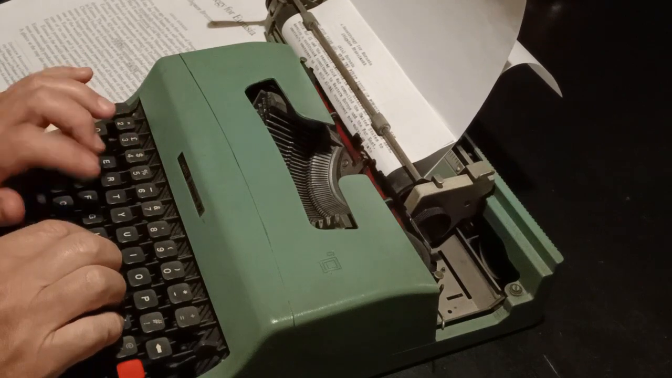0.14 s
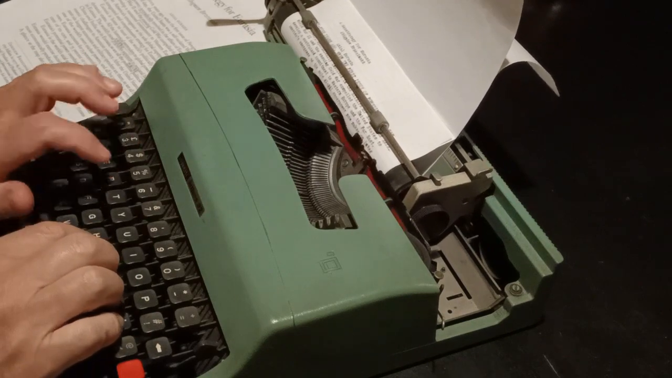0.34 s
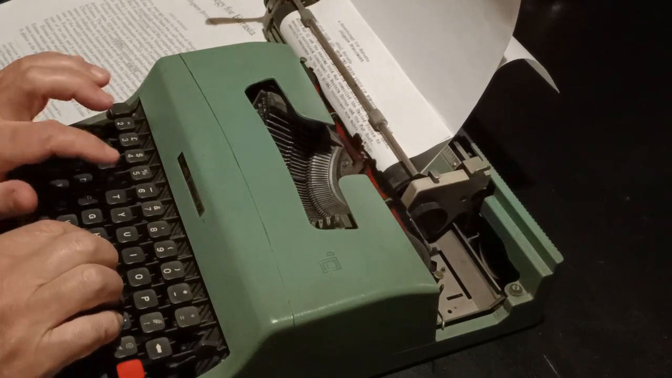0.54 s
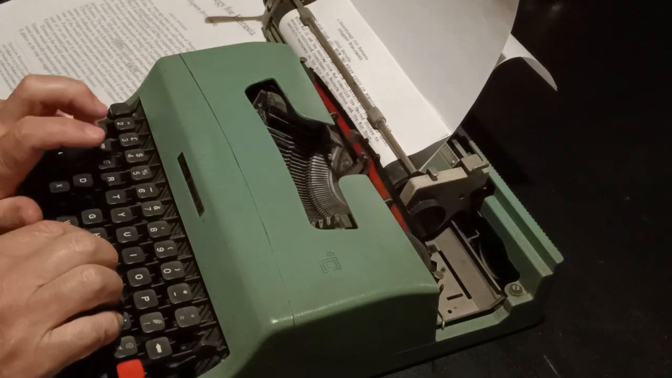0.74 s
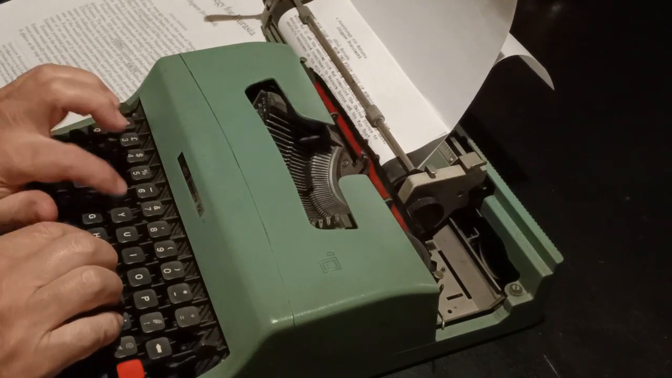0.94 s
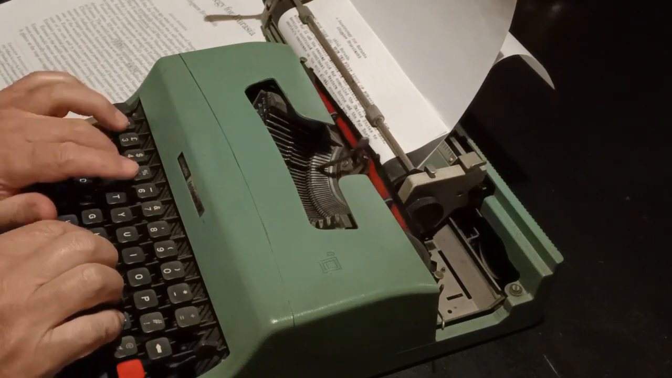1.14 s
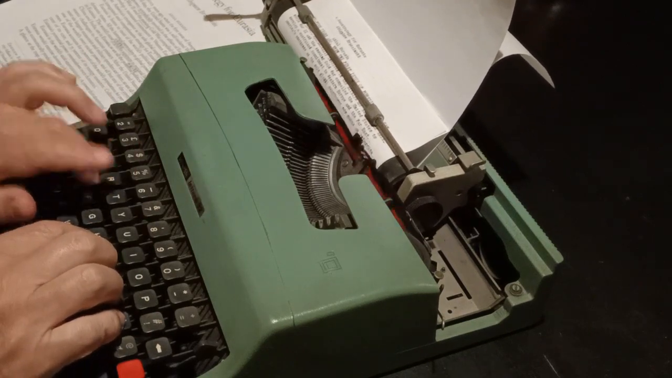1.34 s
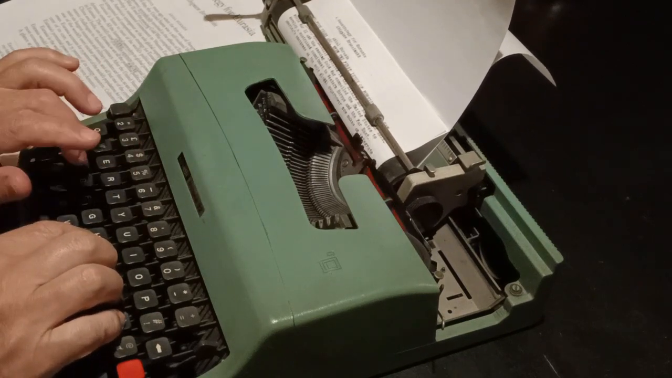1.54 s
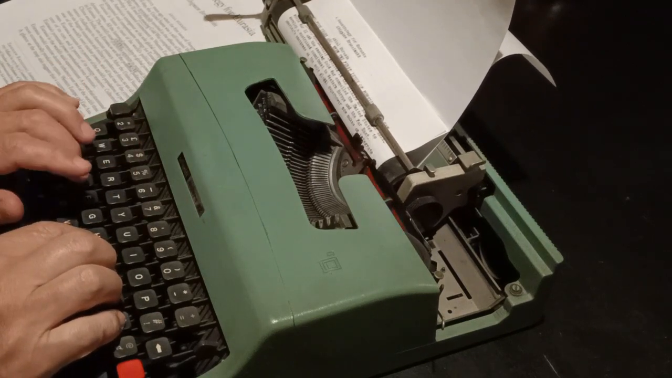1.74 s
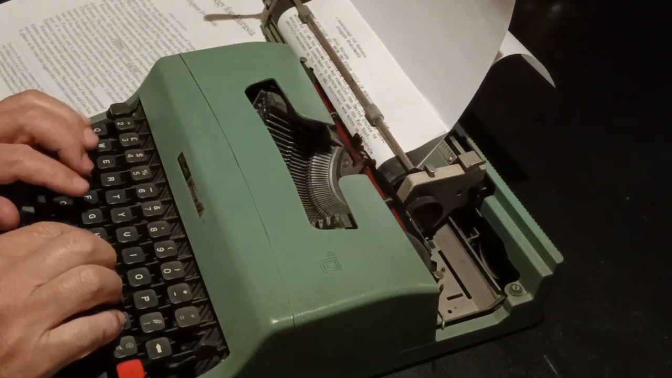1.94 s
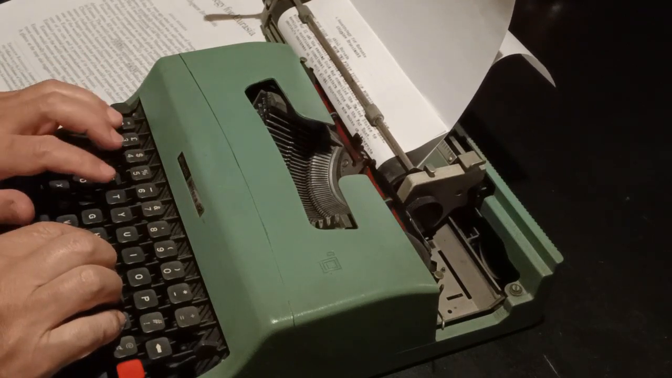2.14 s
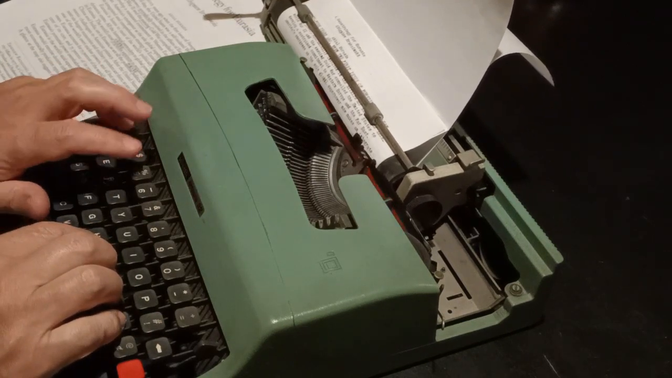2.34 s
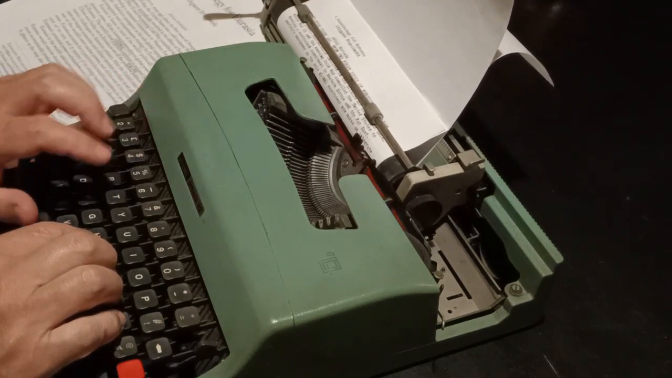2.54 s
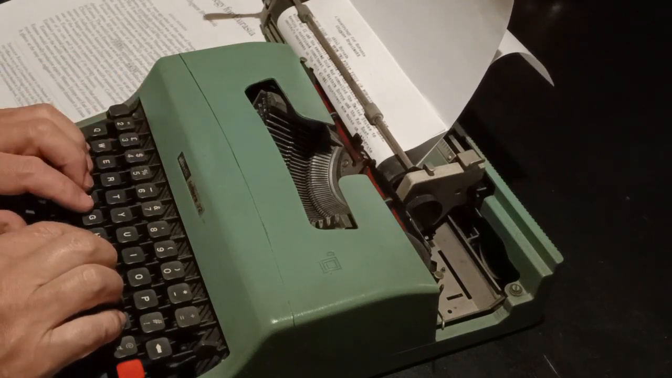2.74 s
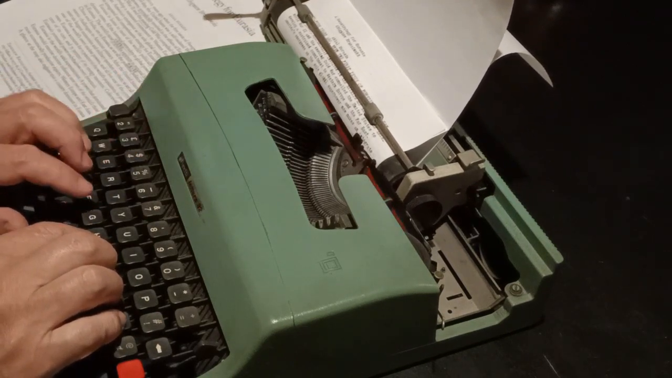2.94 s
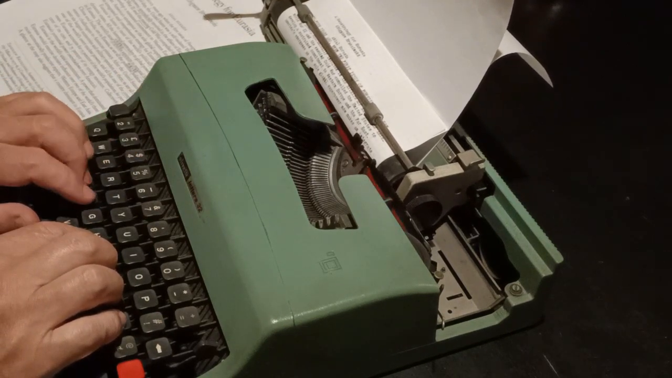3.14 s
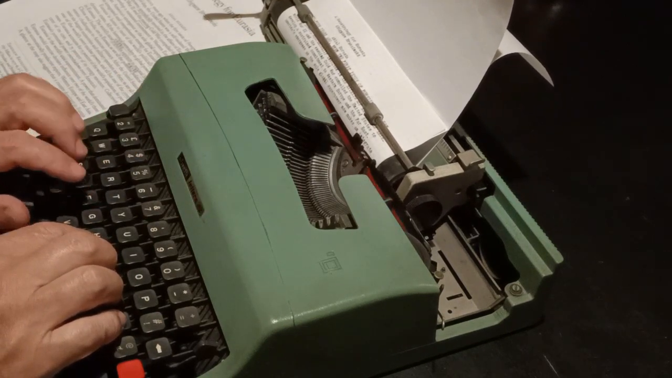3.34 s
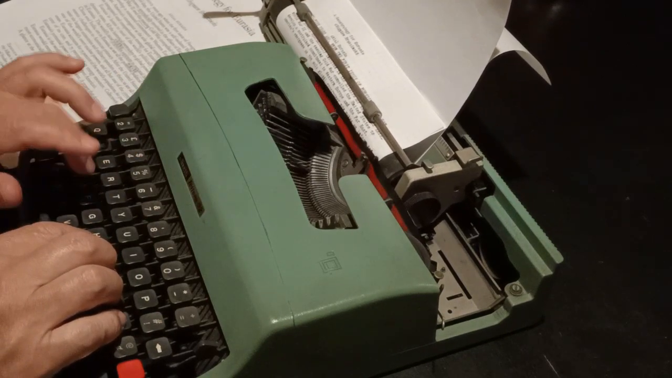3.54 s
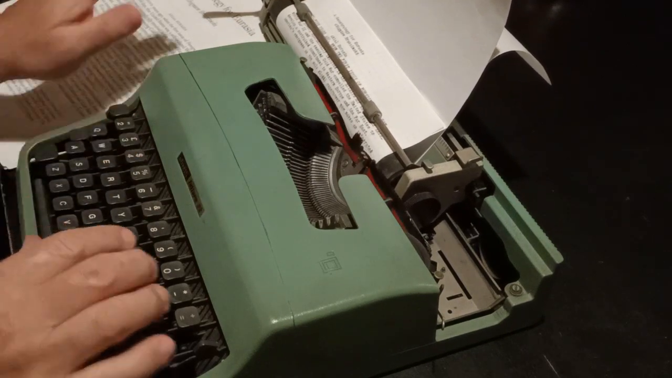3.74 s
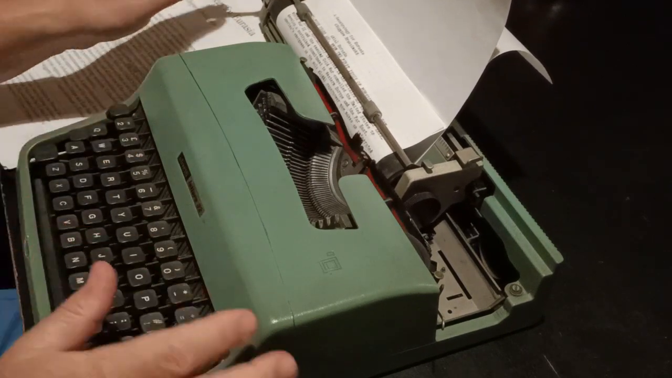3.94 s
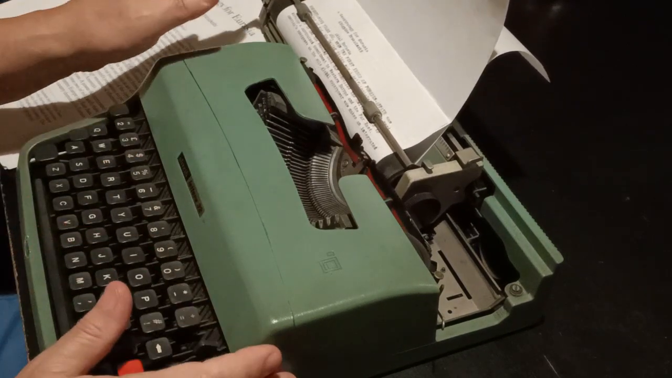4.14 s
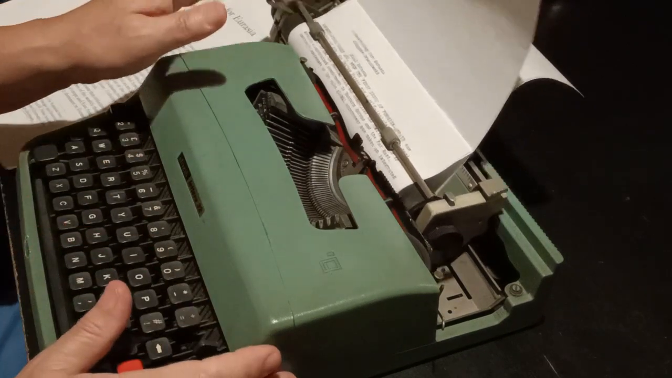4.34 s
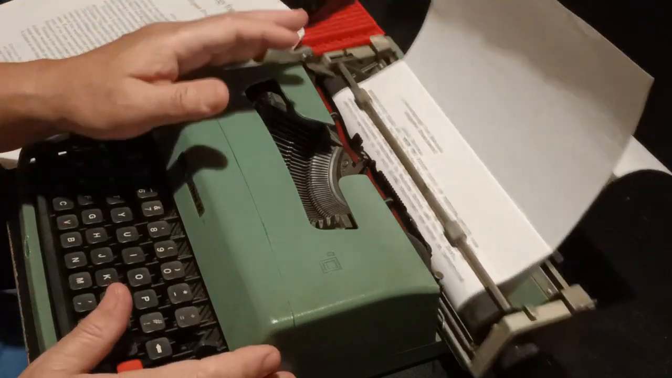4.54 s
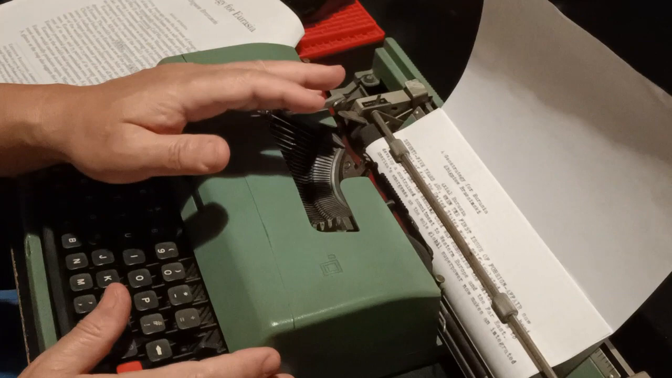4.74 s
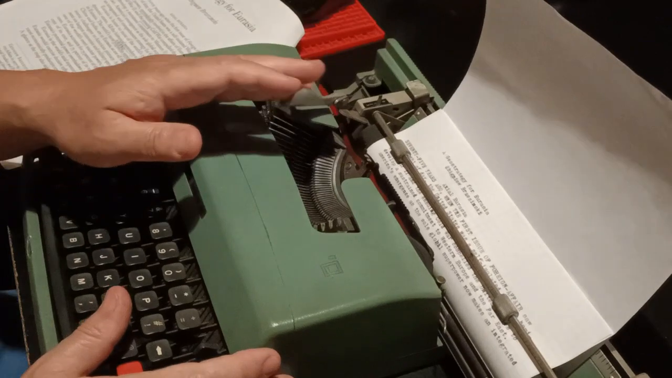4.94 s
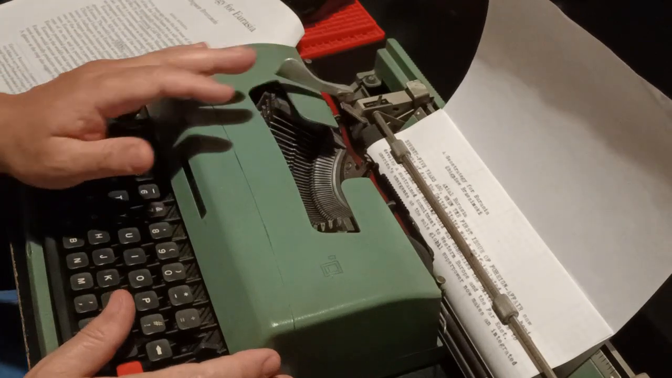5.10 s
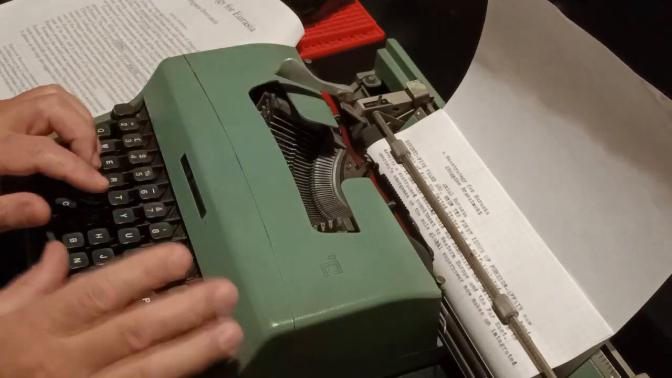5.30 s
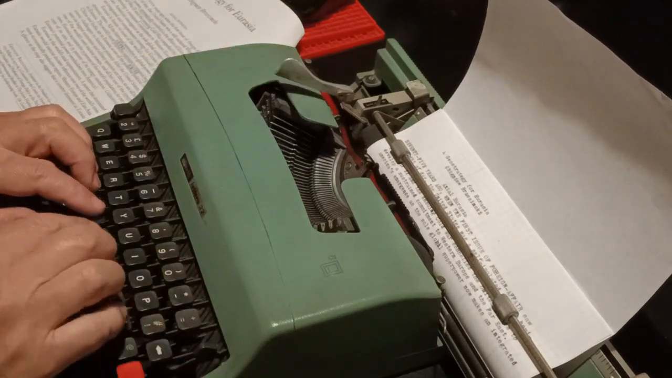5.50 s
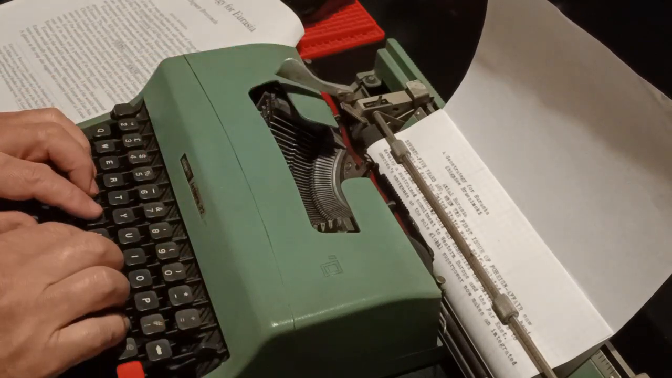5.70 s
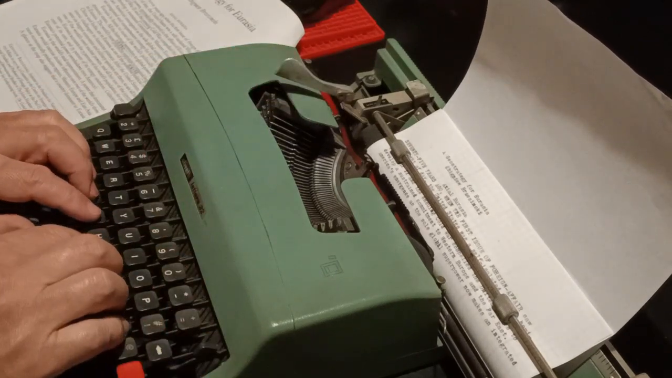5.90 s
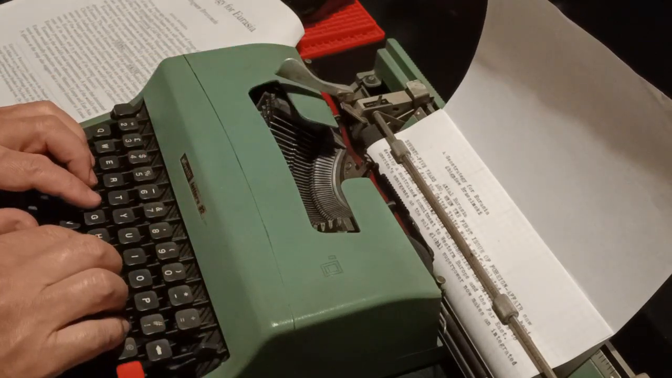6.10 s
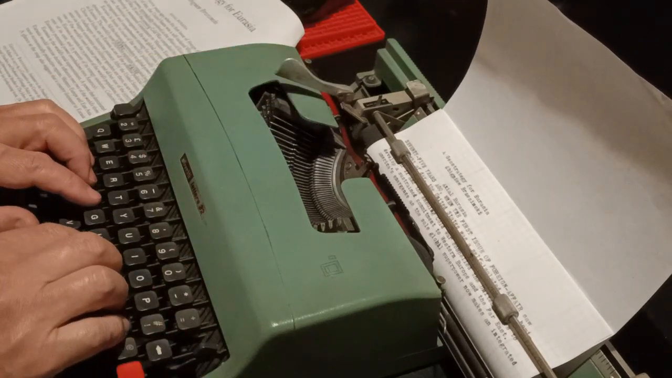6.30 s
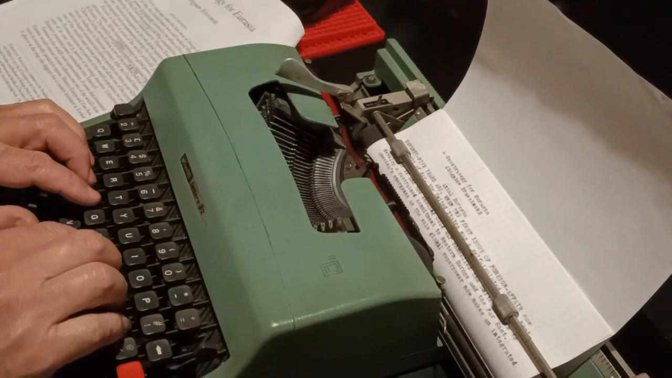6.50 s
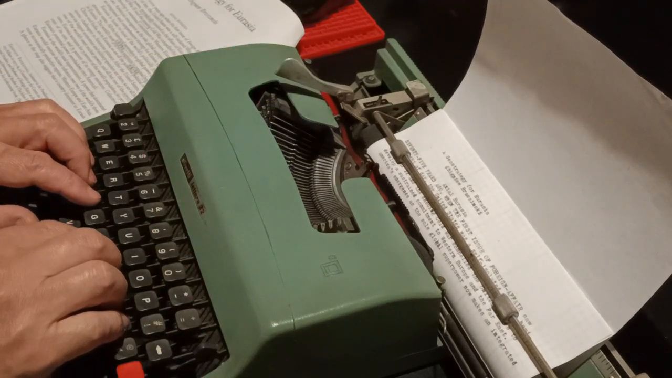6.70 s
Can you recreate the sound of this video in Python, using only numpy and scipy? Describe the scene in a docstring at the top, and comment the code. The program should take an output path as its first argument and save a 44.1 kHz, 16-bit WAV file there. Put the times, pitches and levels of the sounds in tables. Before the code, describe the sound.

A portable manual typewriter, heard close in stereo in a quiet room, types six quick letters, each a sharp metallic slap with a rattle of linkage. A pause holds a few soft key clicks, then one more letter strikes. The line lever clacks and the carriage ratchets home slightly to the right, knocking against its stop, and small catches snap. A faint deep hum swells and fades at the end.

```python
"""Sharp slaps of type on a platen: a portable manual typewriter on a desk in a quiet room, close to a stereo pair.
Each key rattles its linkage, throws a typebar at the platen and lets it drop back into the basket.
Six letters, a pause with a few idle keys, one more letter; then the line lever clacks and the carriage
is pushed home over its ratchet, a little to the right. The heavier blows ring the frame and the room.
Still air lies under it all, and a deep hum swells near the end."""
import sys
import numpy as np
from scipy import signal
from scipy.fft import rfft, irfft, next_fast_len
from scipy.io import wavfile
from scipy.ndimage import uniform_filter1d

SR = 44100
rng = np.random.default_rng(int(sys.argv[2]) if len(sys.argv) > 2 else 0)


def store_pcm(level_fs):
    """Save levels as 16-bit WAV."""
    pcm = np.round(np.clip(level_fs, -1, 1) * 32767).astype(np.int16)
    wavfile.write(sys.argv[1], SR, np.atleast_2d(pcm).T)


N = 302526
T = np.arange(SR // 2) / SR  # time since a blow, s

# Levels in the tables are relative: each source adds its own gain.
# printed letters: strike t/s, level/dB, bar ring f/Hz, platen ring/dB, key lead/s, fall-back delay/s
LETTERS = [(0.0084, -5, 3130, -25, .033, .1126), (0.2586, -5, 2960, -31, .0337, .1093),
           (0.4666, -8, 3080, -28.5, .0386, .1001), (0.7165, -7.3, 3400, -35, .036, .1375),
           (0.9006, -5, 3480, -25, .033, .1275), (1.1772, -5, 3420, -17.5, .033, .1271),
           (3.4593, -6.7, 3590, -12.5, .031, .1341)]
# keys touched without printing: t/s, level/dB, thud/dB, t60/s
IDLE_KEYS = [(0.9918, -30, -42.5, .13), (1.393, -29, -37, 0.25), (2.3424, -33, -33.5, .1),
             (2.4644, -64, -55, .09), (3.152, -46, -58.5, .19), (5.944, -60, -75.5, 0.24)]
# a small spring is plucked: t/s, level/dB
SPRING_PLUCKS = [(0, -37), (3.15, -68.5)]
# key levers drop on their rests: t/s, level/dB
KEY_DROPS = [(1.506, -41), (1.5327, -46.5), (2.3521, -26), (2.537, -39.5), (2.6888, -46), (3.2145, -42)]
# small steel catches snap: t/s, level/dB, ring f/Hz, settling t60/s
CATCH_SNAPS = [(2.5249, -29, 2970, 0.043), (3.992, -46, 2960, 0.045), (4.0057, -34, 4020, 0.048),
               (4.0204, -40.5, 4230, 0.062), (4.0906, -42.5, 3500, 0.033), (4.1038, -26, 4100, .083),
               (4.115, -24.5, 2500, 0.13), (4.266, -39, 1720, 0.14), (4.9935, -26, 2080, 0.035),
               (5.0027, -19, 2160, 0.038), (5.019, -19, 2930, 0.044)]
# line lever and carriage jolt: t/s, level/dB, thud/dB, t60/s
LEVER_JOLTS = [(4.1402, -31, -52, 0.082), (4.1517, -29.5, -45.5, .058), (4.238, -37.5, -59, .064),
               (4.2985, -29, -44.5, 0.081), (4.3813, -31, -58, .082), (4.48, -27, -63, 0.063),
               (4.7039, -34, -46, 0.082), (4.9484, -32.5, -60, 0.039), (4.9574, -31.5, -36.5, 0.11),
               (5.0613, -22.5, -42.5, 0.037), (5.0912, -32, -49, .03)]
# the hand pushes the carriage home: t/s, speed/share of full speed
PUSH_SPEED = [(4.295, 0.48), (4.418, .92), (4.55, 0.98), (4.651, .52), (4.78, 0.3)]

# broad colour of each metal part: f/Hz, level/dB
LINKAGE_COLOUR = [(30, -40.5), (150, -15), (450, -15.5), (900, -3.5), (1600, -15), (3000, -4), (4500, -7),
                  (5800, 2.5), (7400, -9.5), (10000, -15.5), (14000, -7), (16000, -11)]
SLAP_COLOUR = [(150, -36), (450, -27), (900, -18), (1600, -10), (2400, -6.5), (3200, -2), (4200, -3),
               (5700, -3.5), (7200, -10.5), (10000, -19.5), (12000, -18), (14000, -14.5), (16000, -22)]
BASKET_COLOUR = [(30, -42), (150, -8.5), (600, -10.5), (900, -6.5), (1500, -7.5), (2600, 1), (4200, -2.5),
                 (5700, 0), (7400, -10), (10000, -15.5), (14000, -6.5), (16000, -15)]
CATCH_COLOUR = [(150, -15), (700, -18), (1300, -7), (1900, -2.5), (2900, 3), (4200, -5), (5700, 0),
                (7400, -14.5), (10000, -21.5), (14000, -15), (16000, -24)]
LEVER_COLOUR = [(30, -30), (150, 0), (450, -13.5), (1000, -4.5), (1900, 0), (2900, 2.5), (4200, -0.5),
                (5700, 0.5), (7400, -7.5), (10500, -13.5), (13500, -8), (16000, -13)]
RACK_COLOUR = [(200, -20.5), (700, -15.5), (1300, -9), (2500, -1), (4200, -0.5), (5700, -7), (7300, -10),
               (10500, -24), (13000, -15.5), (15000, -16), (16000, -26)]
# resonances of the steel parts and of the carriage rails: f/Hz, width/Hz, level over the colour/dB
STEEL_PEAKS = [(650, 90, 6.5), (986, 25, 0.5), (1630, 80, 0), (2880, 140, -13), (3600, 120, -9.5),
               (3910, 240, -2), (4350, 160, -3.5), (4188, 100, -7.5), (5430, 80, 0.5), (5790, 90, -1)]
RAIL_PEAKS = [(640, 104, 10.5), (1720, 51, 5), (2520, 82, 2), (2650, 80, -2.5), (3500, 58, 2),
              (3940, 42, 6.5), (4030, 49, 4), (5550, 140, 6.5), (5710, 79, 8.5), (5700, 66, 8)]
# modes of the frame on the desk and of the spring: f/Hz, level/dB, t60/s
FRAME_MODES = [(87, -7.5, .13), (118.25, -3, .17), (181, -9, 0.084), (406, -13.5, .12)]
SPRING_MODES = [(6440, -1, .5), (11180, -14.5, .85)]
# room tone: f/Hz, level/dB
AIR_COLOUR = [(20, -22), (32, -11), (44, 2), (60, -9), (90, -11), (175, -12), (285, -19), (450, -19),
              (900, -27), (1400, -32), (2700, -28.5), (4500, -37), (7000, -40.5), (16000, -41)]
# the room's decay: f/Hz, t60/s
ROOM_DECAY = [(100, 0.3), (300, 0.65), (900, .42), (3000, 0.42), (6000, 0.41), (14000, .28)]
# likeness of the sound at the two microphones: f/Hz, correlation
MIC_LIKENESS = [(160, .99), (300, .88), (600, .8), (1200, .64), (2800, .52), (5000, .2), (12000, .05)]


def amp(db):
    """Decibels to amplitude."""
    return 10 ** (np.asarray(db) / 20)


def unit(x):
    """Scale to an RMS of 1."""
    return x / np.sqrt(np.mean(x ** 2) + 1e-20)


def pan(left_db):
    """Gains that favour the left microphone by left_db."""
    return amp([[left_db / 2], [-left_db / 2]])


def along(points, hz):
    """Read (Hz, value) points on a log axis."""
    f, v = np.transpose(points)
    return np.interp(np.log(hz + 1), np.log(f + 1), v)


def add(track, s, x):
    """Mix x into the track at s seconds."""
    start = round(s * SR)
    x, start = x[..., max(-start, 0):], max(start, 0)
    track[:, start:start + x.shape[-1]] += x[..., :N - start]


def filtered(x, response):
    """Shape x by a response of frequency."""
    size = x.shape[-1]
    padded = next_fast_len(size + 8192)
    return irfft(rfft(x, padded) * response(np.fft.rfftfreq(padded, 1 / SR)), padded)[..., :size]


def coloured(noise, colour):
    """Noise shaped by (Hz, dB) points, at an RMS of 1."""
    return unit(filtered(noise, lambda hz: amp(along(colour, hz))))


def spread(pair):
    """Two unrelated signals become left and right, alike in the bass."""
    turn = lambda hz: np.arccos(np.clip(along(MIC_LIKENESS, hz), -1, 1)) / 2
    mid, side = filtered(pair, lambda hz: np.array([np.cos(turn(hz)), np.sin(turn(hz))]))
    return np.array([mid + side, mid - side])


def stereo_noise(size):
    """White noise as the pair hears it."""
    return spread(rng.standard_normal((2, size)))


def ping(hz, t60, rise_s=.0005):
    """One damped mode."""
    envelope = (1 - np.exp(-(T / rise_s) ** 2)) * amp(-60 * T / t60)
    return envelope * np.sin(2 * np.pi * (hz * T + rng.random()))


def metal(colour, resonances=STEEL_PEAKS, size=4096):
    """Impulse response, energy 1, of a part with this colour and these resonances."""
    hz = np.fft.rfftfreq(size, 1 / SR)
    peaks = sum(amp(db) ** 2 / (1 + (2 * (hz - f) / width) ** 2) for f, width, db in resonances)
    cepstrum = irfft(np.log(amp(along(colour, hz)) * np.sqrt(1 + 2 * peaks)))
    cepstrum[1:size // 2] *= 2  # minimum phase: nothing rings before the blow
    cepstrum[size // 2 + 1:] = 0
    response = irfft(np.exp(rfft(cepstrum)))
    return response[None] / np.linalg.norm(response)


def contact(envelope, part):
    """A burst of tiny impacts under the envelope rings a metal part."""
    burst = signal.fftconvolve(stereo_noise(len(T)) * envelope, part, axes=1)[:, :len(T)]
    return burst * np.linalg.norm(envelope) / np.linalg.norm(burst, axis=1, keepdims=True)


def thud(rise_s=0.01, lowest_hz=62, desk_db=-6, desk_t60=0.13):
    """The frame rocks anew at each blow and the desk answers dully; neither radiates deep bass."""
    frame = sum(amp(db + rng.normal(0, 1.6)) * ping(hz * rng.normal(1, 0.02), t60, rise_s)
                for hz, db, t60 in FRAME_MODES)
    desk = coloured(rng.standard_normal(len(T)), [(100, 0.5), (220, -2.5), (700, -19.5), (2000, -50)])
    desk *= (1 - np.exp(-T / rise_s)) * amp(desk_db - 60 * T / desk_t60)
    return signal.sosfilt(signal.butter(2, lowest_hz, "highpass", fs=SR, output="sos"), frame + desk)


def walls(x, wet_db, build_s=0.0063):
    """A fresh diffuse tail, which builds as the walls answer."""
    hz, t, spectra = signal.stft(rng.standard_normal((2, len(T))), SR, nperseg=256)
    decay = amp(-60 * t / along(ROOM_DECAY, hz)[:, None])
    tail = signal.istft(spectra * decay, SR, nperseg=256)[1][:, :len(T)]
    tail = spread(tail) * (1 - np.exp(-(T / build_s) ** 2))
    return amp(wet_db) * signal.fftconvolve(x, tail / np.linalg.norm(tail[0]), axes=1)


def in_room(x, wet_db):
    """The direct sound at the microphones, then the room's answer."""
    return np.pad(x, ((0, 0), (0, len(T) - 1))) + walls(x, wet_db)


def knocks(rows, colour, gain_db, thud_db, cover_db, chatter_db, wet_db):
    """Loose parts chatter, ring the cover and shake the frame. Rows: t/s, level/dB, thud/dB, t60/s."""
    track, part = np.zeros((2, N)), metal(colour)
    attack = 1 - np.exp(-T / .001)
    loose = 1 - np.exp(-T / 0.0037)  # the first contact is firm, the chatter follows
    for s, db, low_db, t60 in rows:
        flutter = unit(uniform_filter1d(rng.standard_normal(len(T)), size=90))
        decay = attack * amp(-60 * T / t60)
        rattle = decay * amp(chatter_db * loose * flutter)
        rattle *= np.linalg.norm(decay) / np.linalg.norm(rattle)
        cover = amp(cover_db + rng.normal(0, 1)) * ping(hz=1012 * rng.normal(1, 0.0083), t60=0.23)
        blow = amp(db + gain_db) * contact(rattle, part) + amp(low_db + thud_db) * thud()
        add(track, s, in_room(blow, wet_db))
        add(track, s, amp(db + gain_db) * cover)
    return track


def keys(press_db=-19.5, press_thud_db=-12, press_t60=.16):
    """The linkage rattles just before each strike, in step with its force; idle keys only rattle."""
    presses = [(s - lead_s, db + press_db, db + press_db + press_thud_db, press_t60)
               for s, db, _, _, lead_s, _ in LETTERS]
    return knocks(presses + IDLE_KEYS, LINKAGE_COLOUR,
                  gain_db=-9, thud_db=3, cover_db=-16, chatter_db=4, wet_db=-4.5)


def typebars(gain_db=-3, thud_db=-27, swing_db=-25, swing_s=.012, rise_s=0.00071, snap_t60=0.012,
             ring_db=-14, ring_t60=0.055, step_db=-24, step_s=0.041):
    """The bar swings up, slaps the platen and rings; then the escapement steps the carriage."""
    track, part = np.zeros((2, N)), metal(SLAP_COLOUR)
    swing = amp(swing_db) * T / swing_s * (T < swing_s)
    attack = 1 - np.exp(-(T / rise_s) ** 2)
    slap = attack * (amp(-60 * T / snap_t60) + amp(ring_db - 60 * T / ring_t60))
    step = amp(step_db) * np.exp(-((T - step_s) / 0.0035) ** 2)
    for s, db, bar_hz, platen_db, _, _ in LETTERS:
        force = amp(db + gain_db) * pan(left_db=0.3)
        clack = contact(slap, part) + contact(step, part)
        # bar and platen ring straight out of the open basket at the microphones
        bar = amp(-1) * ping(bar_hz, t60=0.017, rise_s=.0007)
        platen = amp(platen_db + 2) * ping(hz=1715, t60=.028) * pan(left_db=4)
        # the walls hear the blow from all sides, so they answer with the machine's average colour
        tail = walls(np.linalg.norm(slap) * np.repeat(part, 2, axis=0), wet_db=-7.5)
        add(track, s - swing_s, force * contact(swing, part))
        add(track, s, force * (clack + bar + platen))
        add(track, s, force * tail)
        add(track, s, in_room(amp(db + thud_db) * thud()[None], wet_db=-3.5))
    return track


def spring():
    """The thin, high tone of a plucked spring."""
    track = np.zeros((2, N))
    for s, db in SPRING_PLUCKS:
        for hz, mode_db, t60 in SPRING_MODES:
            add(track, s, amp(db + mode_db) * ping(hz, t60, rise_s=.004))
    return track


def room_tone(gain_db=-65.5):
    """The still air of the room, mostly bass."""
    return amp(gain_db) * coloured(stereo_noise(N), AIR_COLOUR)


def fall_backs(lift_s=.018, bounce_s=.016, bounce_db=-7.5, drop_thud_db=-15.5, drop_t60=0.062):
    """Keys rise and their bars land in the basket; key levers drop on their rests and bounce once."""
    landings = [s + fall_s for s, *_, fall_s in LETTERS]
    lifts = [(s - lift_s, -36, -54, 0.071) for s in landings]
    bars = [(s, -24, -44.5, 0.063) for s in landings]  # a spring pulls each back with the same force
    levers = [(s + k * bounce_s, db + k * bounce_db, db + k * bounce_db + drop_thud_db, drop_t60)
              for s, db in KEY_DROPS for k in range(2)]
    return knocks(bars + levers + lifts, BASKET_COLOUR,
                  gain_db=-2.5, thud_db=4, cover_db=-23, chatter_db=-1, wet_db=-9)


def catches(gain_db=-3, ring_db=-7, snap_t60=0.0029, settle_db=-8):
    """Light catches snap, settle with a short ring of their own and leave the frame still."""
    track, part = np.zeros((2, N)), metal(CATCH_COLOUR)
    attack = 1 - np.exp(-T / .0004)
    for s, db, hz, t60 in CATCH_SNAPS:
        force = amp(db + gain_db)
        snap = attack * (amp(-60 * T / snap_t60) + amp(settle_db - 60 * T / t60))
        add(track, s, in_room(force * contact(snap, part), wet_db=-8))
        add(track, s, force * amp(ring_db) * ping(hz, t60=0.026))
    return track


def lever_and_stop(stop_s=4.7634):
    """Line lever and carriage jolt on the way home, and the run ends against the margin stop."""
    slam = (stop_s, -25, -45, 0.22)
    recoil = (stop_s + .0097, -20.5, -36.5, 0.13)  # the frame takes the blow a moment later
    rock_back = (stop_s + .062, -32, -37.5, 0.11)
    return knocks(LEVER_JOLTS + [slam, recoil, rock_back], LEVER_COLOUR,
                  gain_db=-5.5, thud_db=3, cover_db=-25, chatter_db=1.5, wet_db=-9)


def carriage(gain_db=-43.5, slowest_hz=70, faster_hz=60, tooth_decay_db=15, uneven_db=1.9, rumble_db=-14):
    """The pawl skips over the teeth as the carriage slides on its rails: faster is louder and denser."""
    speed = np.interp(np.arange(N) / SR, *np.transpose(PUSH_SPEED), left=0, right=0)
    wobble = 1 + 0.1 * unit(uniform_filter1d(rng.standard_normal(N), size=1500))
    teeth_hz = (slowest_hz + faster_hz * speed) * wobble
    travel = np.cumsum(np.abs(teeth_hz)) / SR  # in teeth
    tooth = travel.astype(int)
    ticks = amp(uneven_db * rng.standard_normal(N)[tooth] - tooth_decay_db * (travel - tooth))
    ratchet = signal.fftconvolve(stereo_noise(N) * ticks, metal(RACK_COLOUR, RAIL_PEAKS), axes=1)[:, :N]
    rumble = coloured(stereo_noise(N), [(40, -7.5), (110, -10), (220, -13), (600, -19.5), (2000, -86)])
    slide = amp(gain_db) * speed * (unit(ratchet) + amp(rumble_db) * rumble)
    return in_room(slide, wet_db=-1.5)[:, :N]


def hum(start_s=5.73, length_s=1.24, hz=41.6, gain_db=-50.5, octave_db=-21):
    """A deep hum with a faint octave swells once and fades."""
    t = np.arange(N) / SR
    swell = np.sin(np.pi * np.clip((t - start_s) / length_s, 0, 1))
    phase = 2 * np.pi * hz * t
    return np.sqrt(2) * amp(gain_db) * swell * (np.sin(phase) + amp(octave_db) * np.sin(2 * phase))


def scene():
    """Typing in the middle of the pair; carriage, room tone and hum a little to the right."""
    middle = typebars() + keys() + fall_backs() + catches() + spring()
    right = lever_and_stop() + carriage() + room_tone() + hum()
    return middle + right * pan(left_db=-1.2)


def record(dry):
    """The microphone chain cuts off steeply at the top of the treble."""
    top_hz = 15700
    return filtered(dry, lambda hz: 1 / (1 + (hz / top_hz) ** 100))


dry = scene()
out = record(dry)
store_pcm(out)
```